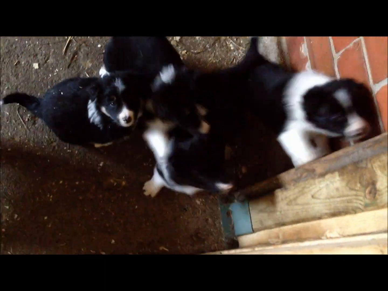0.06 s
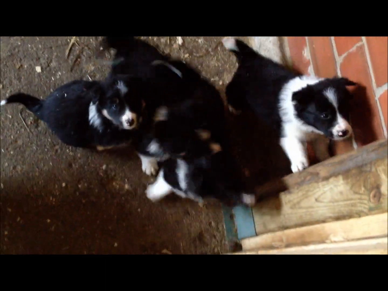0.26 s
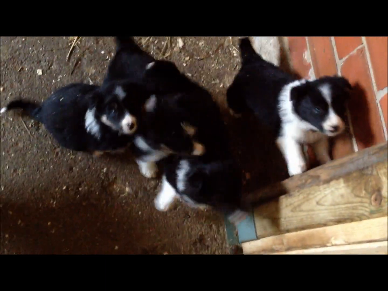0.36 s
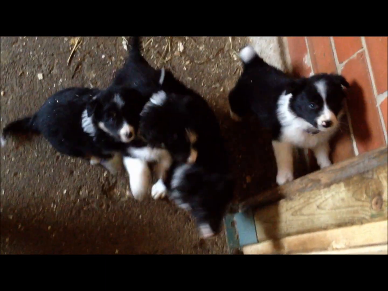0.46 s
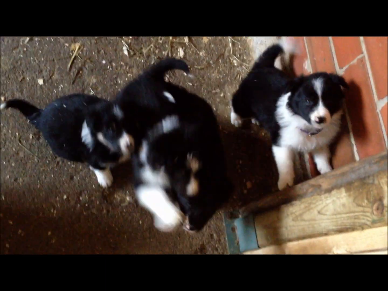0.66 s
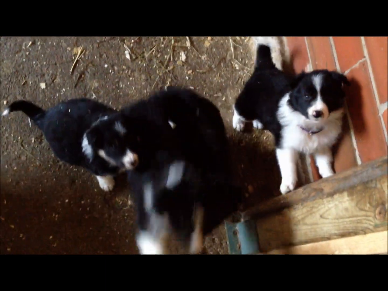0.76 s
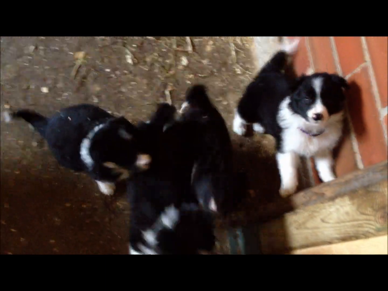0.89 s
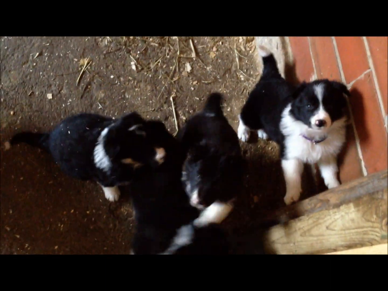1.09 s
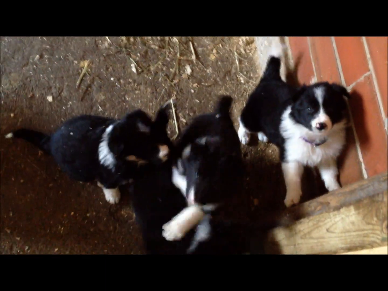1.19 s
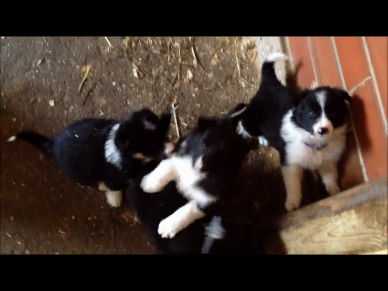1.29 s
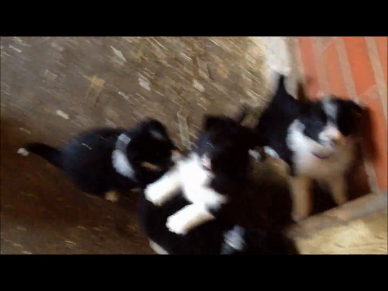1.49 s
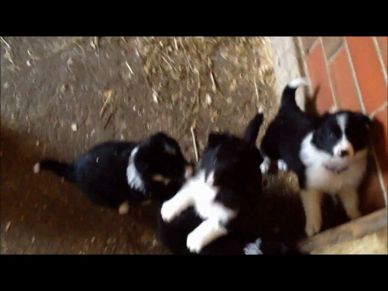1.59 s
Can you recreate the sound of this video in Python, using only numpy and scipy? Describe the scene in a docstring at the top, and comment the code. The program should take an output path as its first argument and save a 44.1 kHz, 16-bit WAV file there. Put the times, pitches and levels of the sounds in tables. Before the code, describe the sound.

Puppies whining: quick thin high-pitched whimpers and one loud yip, echoing lightly between hard barn walls

```python
"""Puppies whining in a barn

Several puppies whine and yip over one another: nearly pure gliding voices, built from sine partials with pulsed
breath noise, ring on between hard walls. Thin squeaks are swept sines in the treble. Paws knock as dying sines
with clicks, and a puppy sniffs once, a burst of noise. A low murmur of air with the blurred ring of distant
whines, and a treble rustle, both coloured noise, lie under it all."""
import sys
import numpy as np
from scipy import signal
from scipy.fft import rfft, irfft, next_fast_len
from scipy.io import wavfile
from scipy.ndimage import uniform_filter1d, map_coordinates

SR = 44100
rng = np.random.default_rng(int(sys.argv[2]) if len(sys.argv) > 2 else 0)


def pcm_store(signal):
    """Save signal as 16-bit PCM."""
    levels = np.round(np.clip(np.atleast_2d(signal), -1, 1) * 32767)
    wavfile.write(sys.argv[1], SR, levels.astype(np.int16).T)


N = 72765
TIME_S = np.arange(N) / SR
TOP_HZ = 15350  # upper limit of the sound
PATCHY_DB = 1.5  # random gain variation of the two noise layers, in dB


def amp(db):
    """Decibels to a linear gain."""
    return 10 ** (np.asarray(db) / 20)


def unit(x):
    """Scale a signal to an rms of 1."""
    return x / np.sqrt(np.mean(x ** 2) + 1e-20)


def along(points, hz):
    """Read a curve of (Hz, value) points on a log frequency axis."""
    point_hz, value = np.transpose(points)
    return np.interp(np.log(hz + 1), np.log(point_hz + 1), value)


def wobble(rate):
    """A smooth random curve with rate knots a second."""
    knots = rng.standard_normal(int(N * rate / SR) + 4)
    return map_coordinates(knots, [TIME_S * rate], order=2)


def filtered(x, response):
    """Multiply the spectrum of x by a response of frequency."""
    size = next_fast_len(N + SR // 2)
    spectrum = rfft(x, size) * response(np.fft.rfftfreq(size, 1 / SR))
    return irfft(spectrum, size)[..., :N]


def highpass(x, cut_hz):
    """Two equal first-order bass cuts in a row."""
    return filtered(x, lambda hz: (1j * hz / (cut_hz + 1j * hz)) ** 2)


def noise(spectrum, patchy_db=0):
    """Coloured noise of rms 1 whose gain varies in random patches of time and frequency."""
    z = signal.stft(rng.standard_normal(N + 512), nperseg=512)[2]
    patches = uniform_filter1d(rng.standard_normal(z.shape), size=3, axis=0)
    patches = uniform_filter1d(patches, size=10, axis=1)
    x = signal.istft(z * amp(patchy_db * unit(patches)), nperseg=512)[1][:N]
    return unit(filtered(x, lambda hz: amp(along(spectrum, hz))))


def air():
    """Almost steady noise coloured as a murmur of air with the blurred ring of distant whines."""
    # tone colour of the air with the blurred ring of distant whines:
    # freq_hz [Hz], density_db [relative dB per Hz]
    murmur_colour = [(25, -44), (150, -5), (400, -9.5), (1000, -0.5), (1400, -11.5), (2300, -20),
                     (3200, -7), (4500, -25.5), (6500, -32), (15500, -25.5)]
    return amp(-56 + 0.24 * wobble(1.5)) * noise(murmur_colour, PATCHY_DB)


def rustle():
    """High noise that comes and goes along a level curve."""
    # level of the treble rustle: time_s [s], level_db [dB]
    rustle_level = [(0.0, -54), (0.118, -57.5), (0.266, -61.5), (0.334, -59), (0.62, -67), (0.752, -96),
                    (1.235, -69.5), (1.41, -69.5), (1.65, -98)]
    # tone colour of the rustle: freq_hz [Hz], gain_db [relative dB]
    rustle_colour = [(2000, -49.5), (5000, -4), (8000, 10), (10000, -4.5), (13500, -7), (15400, -13.5)]
    time_s, level_db = np.transpose(rustle_level)
    level_db = np.interp(TIME_S, time_s, level_db) + 1.0 * wobble(7.7)
    return amp(level_db) * noise(rustle_colour, PATCHY_DB)


def barn(x):
    """Late echo off the walls: a noise tail in which each frequency dies at its own speed."""
    # decay of the walls' answer: freq_hz [Hz], t60_s [s to fall by 60 dB]
    wall_decay = [(300, 0.22), (1200, 0.5), (3000, 0.53), (6000, 0.92), (12000, 0.14)]
    delay_s = 0.015
    hz, t, z = signal.stft(rng.standard_normal(SR), SR, nperseg=256)
    t60_s = along(wall_decay, hz)[:, None]
    tail = signal.istft(z * amp(-60 * t / t60_s), SR, nperseg=256)[1]
    tail = tail / np.linalg.norm(tail)
    delayed = np.pad(x, (int(delay_s * SR), 0))
    return signal.fftconvolve(delayed, tail)[:N]


def knocks():
    """Paw knocks: each a dull sine dying over a few cycles, with a short click on top."""
    # paw knocks: start_s [s], thud_hz [Hz], thud_db [dB], click_db [dB]
    knock_rows = [(0.051, 277, -39, -74.5), (0.556, 200, -35.5, -73), (0.597, 200, -36, -73),
                  (0.788, 350, -37, -65), (1.211, 177, -66, -55), (1.342, 480, -31.5, -34.5)]
    thud_cycles, click_s = 4, 0.0055  # time to fall by 60 dB, in cycles and in s
    click_hz, low_cut_hz = 2200, 160
    out = np.zeros(N)
    for start_s, thud_hz, thud_db, click_db in knock_rows:
        since_s = np.maximum(TIME_S - start_s, 0)
        thud = np.sin(2 * np.pi * thud_hz * since_s) * amp(-60 * since_s * thud_hz / thud_cycles)
        click = amp(click_db - 60 * since_s / click_s) * np.cos(2 * np.pi * click_hz * since_s)
        out += amp(thud_db) * thud + (TIME_S >= start_s) * click
    return highpass(out, low_cut_hz)


def sniff():
    """One sniff of breath: a flickering burst of bright noise that swells and dies."""
    # tone colour of the sniff: freq_hz [Hz], gain_db [relative dB]
    sniff_colour = [(1000, -33), (4000, -7.5), (7500, -2), (10000, -10.5), (15000, -12)]
    peak_s, rise_s, fall_s, level_db = 0.948, 0.028, 0.03, -52
    width_s = np.where(TIME_S < peak_s, rise_s, fall_s)
    swell = np.exp(-np.abs(TIME_S - peak_s) / width_s)
    return amp(level_db + 2.6 * wobble(140)) * swell * noise(sniff_colour)


def squeaks(count=28):
    """Short whistles whose pitch moves fast and then eases; count fainter ones lie at random."""
    # thin squeaks: start_s [s], length_s [s], start_hz [Hz], end_hz [Hz], level_db [dB]
    squeak_rows = [(0.013, 0.025, 9530, 7810, -43.5), (0.167, 0.031, 6200, 5910, -45),
                   (0.187, 0.019, 8800, 9900, -52), (0.38, 0.011, 8160, 6880, -41.5),
                   (0.5, 0.047, 9170, 7800, -50.5), (0.612, 0.025, 11200, 11100, -56),
                   (0.641, 0.019, 8600, 8160, -48), (0.837, 0.037, 8670, 7820, -46),
                   (1.208, 0.012, 13800, 13500, -61), (1.272, 0.023, 8450, 8150, -55),
                   (1.287, 0.043, 10600, 8100, -47), (1.388, 0.0092, 9350, 8750, -52),
                   (1.416, 0.029, 7440, 7500, -66), (1.466, 0.049, 5580, 5320, -63.5)]
    octave_db, bend = -9, 0.56  # second partial; exponent of the pitch sweep
    when, length, pitch, fall, level = rng.random((count, 5)).T
    far_hz = 5500 + 8500 * pitch
    far_end_hz = far_hz * (1.03 - 0.12 * fall)
    far = zip(when * N / SR, 0.014 + 0.015 * length, far_hz, far_end_hz, -73 + 6 * level)
    out = np.zeros(N)
    for start_s, length_s, start_hz, end_hz, level_db in [*squeak_rows, *far]:
        progress = np.clip((TIME_S - start_s) / length_s, 0, 1)
        hz = start_hz + (end_hz - start_hz) * progress ** bend
        phase = 2 * np.pi * np.cumsum(hz) / SR
        whistle = np.sin(phase)
        if 2 * start_hz < TOP_HZ:
            whistle = whistle + amp(octave_db) * np.sin(2 * phase)
        out += amp(level_db + 1.5 * wobble(180)) * np.sin(np.pi * progress) * whistle
    return out


def cry(rows, breath_db, jitter, sheen_db):
    """One voice: slightly unsteady partials on a gliding pitch, with breath pulsed once a cycle."""
    # tone colour of the breath: freq_hz [Hz], gain_db [relative dB]
    breath_colour = [(400, -55), (900, -24.5), (1500, -5.5), (3200, -11), (4500, -23.5), (8000, -19.5),
                     (15000, -45.5)]
    # throat resonance shaping partials 5 to 8: freq_hz [Hz], gain_db [relative dB]
    throat_colour = [(2000, -17.5), (3300, 9.5), (4300, -21.5), (5300, -19.5), (6500, -27.5), (10000, -73)]
    # faint high partials: freq_hz [Hz], level_db [dB re fundamental, before sheen_db]
    sheen_colour = [(4500, -60), (6500, -48), (9000, -60.5), (12000, -45.5), (15000, -56)]
    edge_s, jitter_rate = 0.0022, 120  # half the fade at each end; pitch knots a second
    shimmer_db, sheen_flicker_db = 0.56, 5.5
    rasp_base_db, rasp_rate, rasp_top_db = 0.93, 150, 4  # fast flutter, growing with each partial
    rasp_per_glide = 0.00024  # extra flutter while the pitch slides fast, dB per Hz/s

    time_s, *columns = np.transpose(rows)
    hz, *levels = [uniform_filter1d(np.interp(TIME_S, time_s, c), size=200) for c in columns]
    phase = 2 * np.pi * np.cumsum(hz * (1 + jitter * wobble(jitter_rate))) / SR
    glide = np.abs(np.gradient(hz)) * SR
    rasp_db = np.minimum(rasp_base_db + rasp_per_glide * glide, 6)

    # partials 5 to 8 follow the fourth through the throat
    fourth_db = levels[3] - along(throat_colour, 4 * hz)
    levels += [fourth_db + along(throat_colour, k * hz) for k in range(5, 9)]
    tone = np.zeros(N)
    for k, level_db in enumerate(levels):
        flutter_db = np.minimum(rasp_db * np.sqrt(k) * wobble(rasp_rate), rasp_top_db)
        gain = amp(level_db + shimmer_db * wobble(39.2) + flutter_db)
        tone += gain * np.sin((k + 1) * phase + k)
    for k in range(5, 18):
        level_db = levels[0] + sheen_db + along(sheen_colour, k * hz)
        tone += amp(level_db + sheen_flicker_db * wobble(110)) * np.sin(k * phase)

    pulsed = (1 + np.cos(phase)) * rng.standard_normal(N)
    breath = unit(filtered(pulsed, lambda f: amp(along(breath_colour, f))))
    breath = amp(levels[0] + breath_db) * breath
    inside_s = np.minimum(TIME_S - time_s[0], time_s[-1] - TIME_S) + edge_s
    gate = np.clip(inside_s / (2 * edge_s), 0, 1) ** 2
    return gate * (np.sqrt(2) * tone + breath)  # sqrt(2): partial levels are rms


def puppies():
    """All whines and yips, each paired with the level of its wall echo in dB."""
    # pitch glides and partial levels of the whines, then of the loud yips; every table has
    # time_s [s], pitch_hz [Hz], fundamental_db, second_db, third_db, fourth_db [dB]
    whine_1 = [(0.0, 1035, -34, -62, -59, -79.5), (0.03, 997, -44, -69.5, -64, -90.5),
               (0.066, 1057, -35.5, -73, -85.5, -80.5), (0.072, 1032, -46, -89, -67.5, -92),
               (0.1, 889, -40.5, -69, -76.5, -83)]
    whine_2 = [(0.044, 799.0, -62, -101, -58.5, -61.5), (0.069, 835.6, -43, -53, -61, -63.5),
               (0.089, 838.6, -49, -53, -57, -77), (0.107, 905, -33, -64, -54.5, -90.5),
               (0.129, 1001, -31.5, -58, -51.5, -56.5), (0.157, 1031, -28.5, -55, -56, -84.5),
               (0.178, 1110, -47.5, -67.5, -70.5, -82.5)]
    whine_3 = [(0.328, 593.6, -48, -35, -71, -83.5), (0.34, 643, -44, -31, -88, -56),
               (0.376, 818.7, -43, -84, -46.5, -58.5), (0.414, 986, -34.5, -51, -51, -63),
               (0.444, 1098, -30, -84, -76, -98), (0.464, 1141, -25, -48, -89, -58.5),
               (0.496, 1106, -31, -58.5, -81.5, -82), (0.518, 973, -43, -81, -81.5, -87)]
    whine_4 = [(0.599, 1065, -22.5, -52, -28, -73), (0.614, 1073, -22.5, -51.5, -34, -52),
               (0.624, 1063, -22, -67, -36.5, -57), (0.652, 1052, -35.5, -59, -57, -78),
               (0.712, 1096, -30.5, -71, -57, -96), (0.738, 1255, -33.5, -72, -63, -79)]
    whine_5 = [(0.735, 734, -51, -37, -38, -60), (0.753, 811, -37.5, -60, -39.5, -37.5),
               (0.768, 882, -36.5, -61, -36.5, -39.5), (0.787, 908.7, -44, -55, -32, -38.5),
               (0.815, 1077, -23.5, -51, -51.5, -78), (0.83, 1131, -34.5, -74, -61, -84),
               (0.841, 1086, -29, -51.5, -72, -85), (0.854, 1040, -45, -65, -69, -89)]
    whine_6 = [(0.862, 863, -42.5, -66, -74, -72), (0.89, 946.6, -31, -41.5, -40, -58),
               (0.908, 1023, -26, -41.5, -32, -52.5), (0.928, 1049, -23.5, -41.5, -36, -58.5),
               (0.953, 1043, -24, -42, -35.5, -55), (0.978, 996, -26, -52, -32.5, -71),
               (1.012, 880, -35, -41.5, -53.5, -43), (1.043, 726.5, -37, -31.5, -59, -43),
               (1.058, 600, -32, -41, -56, -57), (1.066, 490, -47, -50, -56.5, -77)]
    whine_7 = [(0.91, 446.6, -50, -70.5, -71, -83), (0.939, 611, -54.5, -59, -77, -66),
               (0.979, 597, -42.5, -70, -81, -53)]
    whine_8 = [(1.119, 866.7, -47, -66, -79, -65), (1.141, 873, -56, -60, -84, -82),
               (1.188, 888, -42.5, -62, -83, -93)]
    whine_9 = [(1.212, 735, -57, -31, -65, -52), (1.222, 746, -47, -47.5, -64, -47),
               (1.23, 839, -35, -46, -53, -55), (1.244, 870, -34.5, -49, -42.5, -53),
               (1.252, 959, -29.5, -48, -58, -65), (1.264, 1007, -30, -50.5, -46, -65),
               (1.278, 1061, -24.5, -50.5, -55, -98), (1.29, 1095, -27, -67, -59, -90),
               (1.354, 1097, -28.5, -82, -56, -92), (1.431, 1064, -29.5, -61, -60.5, -94),
               (1.448, 1006, -31.5, -57, -73, -95), (1.466, 916.5, -35, -61, -60, -65),
               (1.496, 906, -33, -67, -68, -62), (1.52, 859.6, -35, -58, -63, -61),
               (1.543, 831, -35.5, -58, -65, -49), (1.581, 786.4, -44, -50.5, -67, -56.5),
               (1.601, 679.4, -36, -49.5, -81, -62), (1.622, 501, -44.5, -40, -68, -86.5)]
    whine_10 = [(0.333, 1338, -23, -58.5, -60.5, -76), (0.359, 1252, -24.5, -73, -67, -79),
                (0.382, 1102, -29.5, -68, -74.5, -79.5), (0.39, 1136, -71, -67.5, -67, -84)]
    whine_11 = [(0.0, 1550, -45.5, -61, -70.5, -71), (0.016, 1526, -52, -68.5, -80, -77.5),
                (0.03, 1457, -69, -70.5, -76.5, -81)]
    yip_1 = [(0.196, 1501, -26.5, -53, -63.5, -61.5), (0.204, 1282, -20, -29, -41.5, -57.5),
             (0.219, 1200, -8.5, -23, -33, -45), (0.228, 1180, -7.5, -15, -37.5, -51),
             (0.245, 1279, -4.5, -34, -28.5, -52.5), (0.258, 1275, -6, -21, -24.5, -51),
             (0.275, 1313, -8, -31, -39.5, -37.5), (0.286, 1295, -16, -35, -43, -53.5),
             (0.304, 1320, -27.5, -34, -30, -66.5), (0.332, 1349, -46.5, -65, -44, -68)]
    yip_2 = [(0.533, 1046, -30, -50, -56, -55), (0.549, 1061, -34, -37.5, -39.5, -64),
             (0.571, 1061, -20.5, -16, -35.5, -56.5), (0.587, 1055, -17, -18, -33.5, -42),
             (0.597, 1136, -24, -22.5, -36, -47), (0.607, 1234, -38, -51.5, -36, -56)]
    yip_3 = [(0.6, 1201, -19, -53.5, -36.5, -41), (0.607, 1339, -24, -33, -44, -52),
             (0.628, 1390, -24, -41, -46, -54), (0.642, 1281, -30, -49, -43, -54),
             (0.656, 1238, -30, -46.5, -47.5, -69), (0.67, 1069, -22.5, -50.5, -46, -82),
             (0.696, 918, -49, -38.5, -41, -54), (0.71, 725, -46.5, -47, -65, -53),
             (0.722, 610, -48, -40, -72, -73)]
    # voice of each cry, in the order below: breath_db [dB re fundamental], jitter [share of pitch],
    # echo_db [dB], sheen_db [dB added to the high partials]
    voice_colour = [(-20, 0.0068, -3.5, -5), (-34, 0.0015, -8, -3), (-28, 0.0049, -6.5, -6.5),
                    (-56, 0.01345, -7.5, -8.5), (-22.5, 0.01, -10.5, -5.5), (-24.5, 0.0066, -10, -4.5),
                    (-33, 0.0061, -0.5, -14), (-33, 0.0066, 1.5, -6), (-61, 0.0025, -10.5, 3),
                    (-39.5, 0.0015, -5.5, -5.5), (-31.5, 0.0058, -17.5, -8), (-43, 0.0025, -11.5, -18),
                    (-29.5, .003, -22.5, -13), (-32, 0.011, -7.5, -8.5)]
    cries = [whine_1, whine_2, whine_3, whine_4, whine_5, whine_6, whine_7, whine_8, whine_9,
             whine_10, whine_11, yip_1, yip_2, yip_3]
    voices = []
    for rows, (breath_db, jitter, echo_db, sheen_db) in zip(cries, voice_colour):
        voices.append((cry(rows, breath_db, jitter, sheen_db), echo_db))
    return voices


def scene():
    """Cries, squeaks and paws arrive directly and off the walls, over the air and rustle."""
    mix = air() + rustle()
    sources = [(knocks() + sniff(), -14), (squeaks(), -17), *puppies()]  # (sound, echo dB)
    for sound, echo_db in sources:
        mix += sound + amp(echo_db) * barn(sound)
    return mix[None]


def record(dry):
    """A gain control that ducks under loud cries, bass cut, clipping, one pop, the band limit."""
    duck_from_db, duck_share, duck_s = -26.5, 0.35, 0.081  # threshold, dB cut per dB over, smoothing
    low_cut_hz = 109
    clip_at, clip_hardness = 0.5, 30
    pop_s, pop_db, pop_fall_s = 0.244, -50, 0.0021  # a soft pop in the loudest yip

    keep = np.exp(-1 / (duck_s * SR))
    power = signal.lfilter([1 - keep], [1, -keep], dry ** 2)
    level_db = 10 * np.log10(power + 1e-12)
    x = dry * amp(-duck_share * np.maximum(level_db - duck_from_db, 0))
    x = highpass(x, low_cut_hz)
    x = x / (1 + np.abs(x / clip_at) ** clip_hardness) ** (1 / clip_hardness)
    since_s = np.maximum(TIME_S - pop_s, 0)
    x = x + amp(pop_db) * (since_s > 0) * np.exp(-since_s / pop_fall_s)
    return filtered(x, lambda hz: hz < TOP_HZ)


dry = scene()
out = record(dry)
pcm_store(out)
```